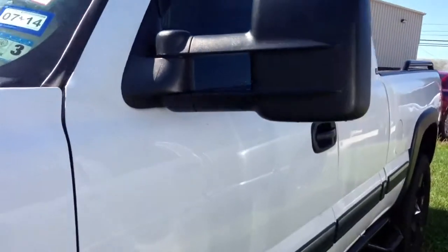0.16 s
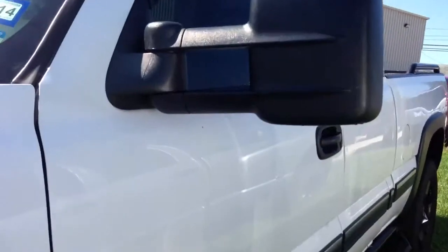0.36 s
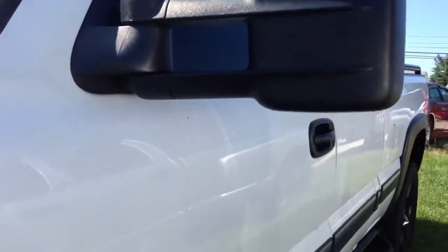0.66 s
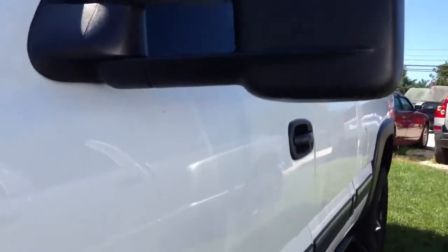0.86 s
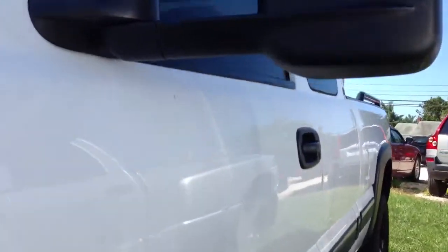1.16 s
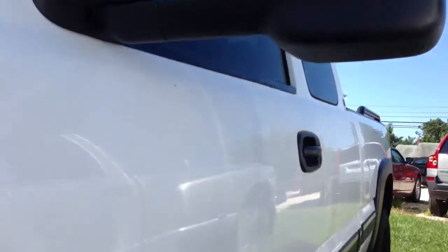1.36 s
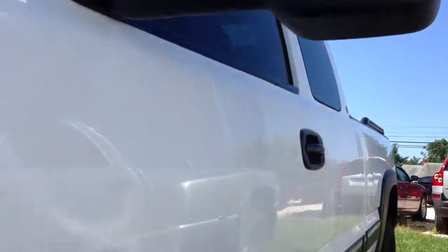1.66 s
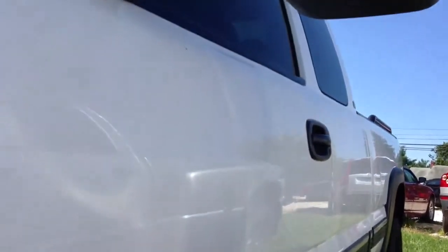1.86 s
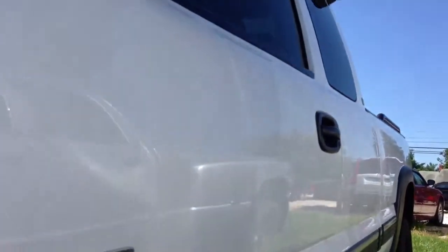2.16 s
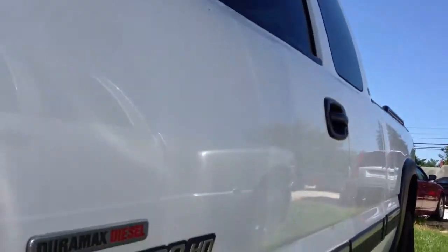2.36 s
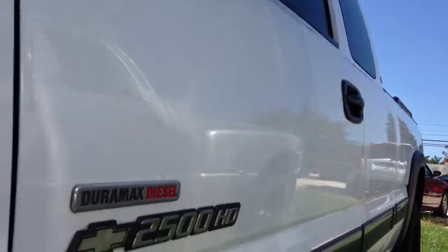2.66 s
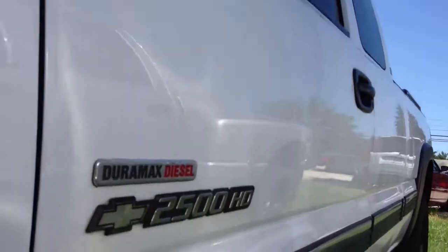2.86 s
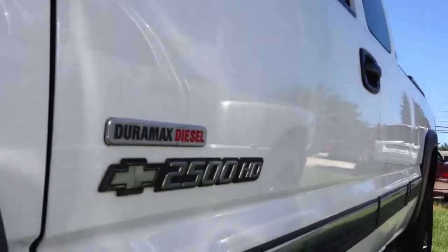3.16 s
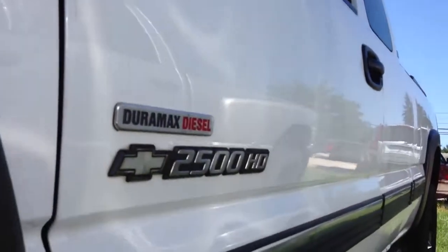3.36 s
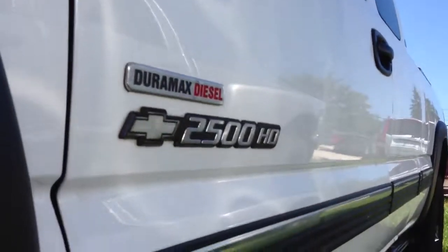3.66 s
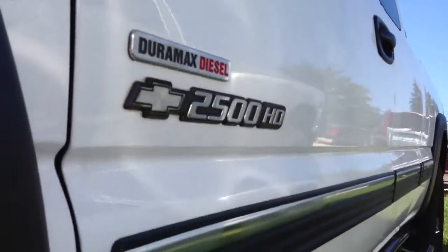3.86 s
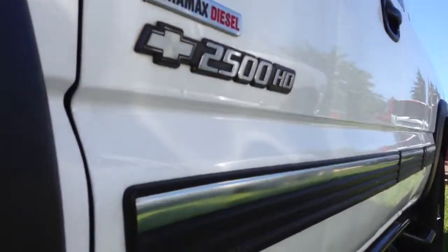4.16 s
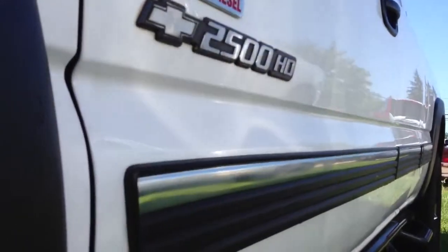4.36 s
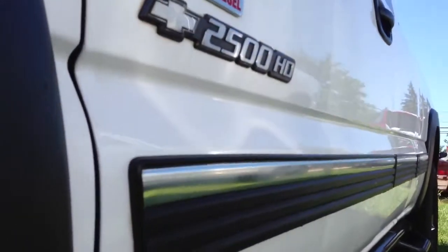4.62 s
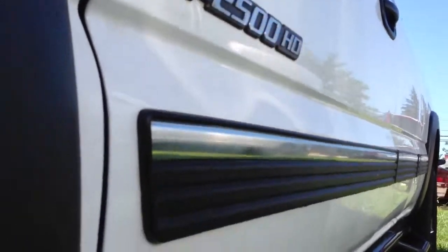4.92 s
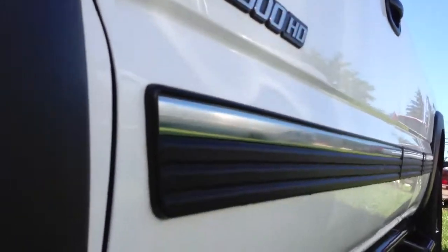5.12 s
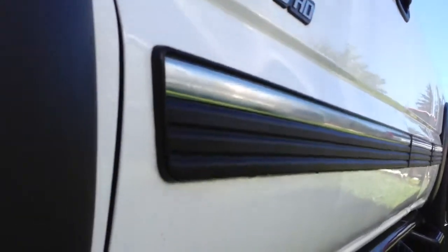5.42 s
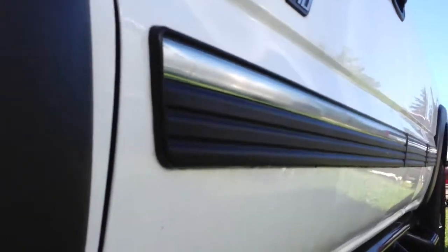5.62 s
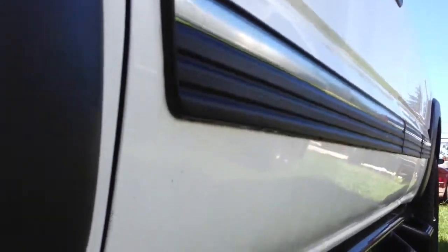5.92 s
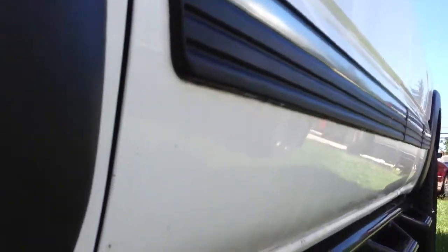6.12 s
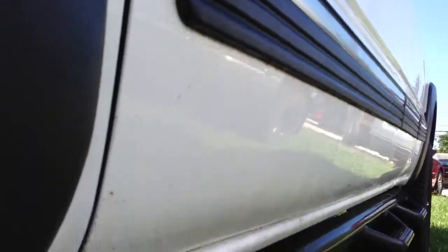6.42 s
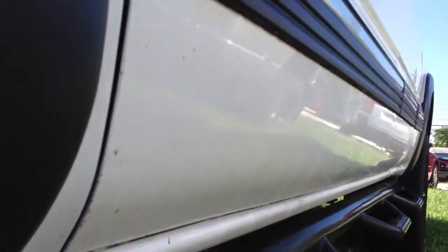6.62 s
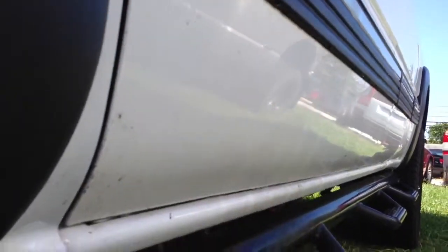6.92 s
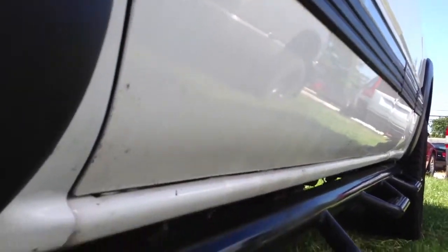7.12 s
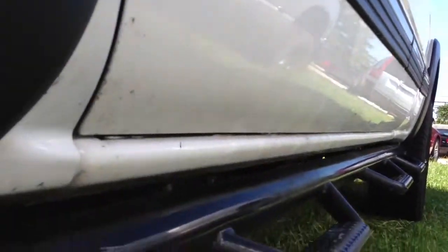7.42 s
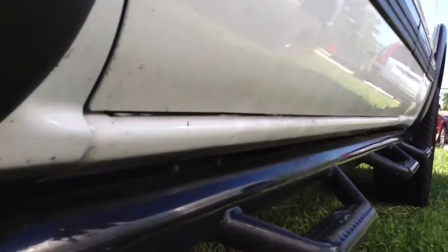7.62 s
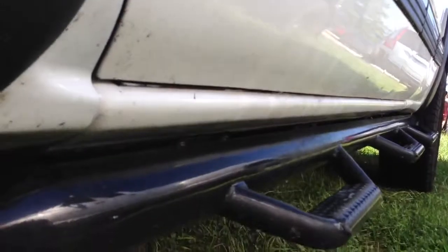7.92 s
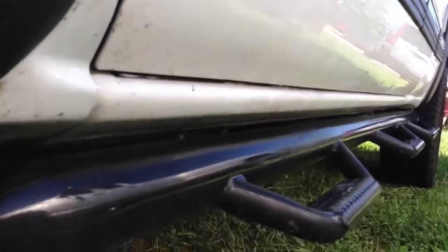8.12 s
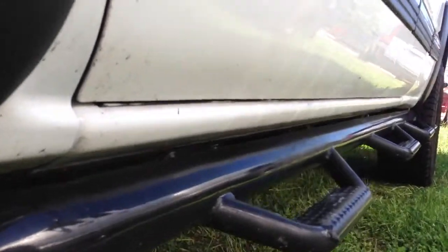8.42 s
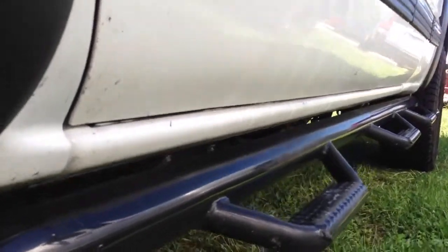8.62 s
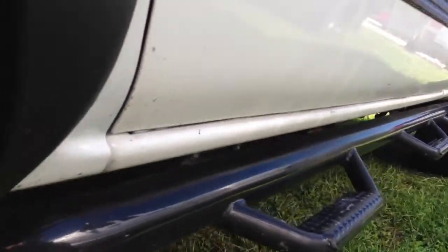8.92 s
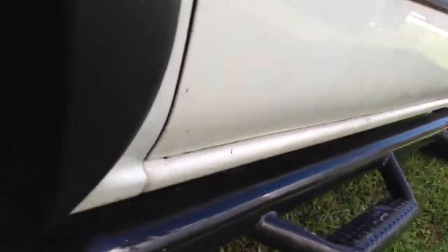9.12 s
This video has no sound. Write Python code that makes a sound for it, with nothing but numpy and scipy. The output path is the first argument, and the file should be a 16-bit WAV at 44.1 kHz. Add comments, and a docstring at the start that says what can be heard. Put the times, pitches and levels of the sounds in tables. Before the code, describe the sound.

A diesel engine idles as a low throbbing hum outdoors, with soft wind thumps, thin high insect trilling and a few late handling ticks.

```python
"""Diesel engine idling outdoors

A diesel engine idles with a drifting speed: many multiples of its crank speed, shaped by the exhaust, hum
near 200 Hz. Wind at a small hand-held microphone is lumpy low noise with short thumps. Far traffic, a low
drone, rustling grass and hiss are shaped noise; a cricket sings in paired tones and katydids in runs of
short rings. The camera body adds ticks (filtered clicks) and the scrape of a sliding hand (noise).
"""
import sys
import numpy as np
from scipy import signal
from scipy.fft import rfft, irfft
from scipy.io import wavfile
from scipy.ndimage import uniform_filter1d

SR = 44100
rng = np.random.default_rng(int(sys.argv[2]) if len(sys.argv) > 2 else 0)


def natural_amplitude(level_db):
    """Convert a level in decibels to a linear amplitude factor, elementwise."""
    exponent = np.asarray(level_db, float) / 20
    return 10 ** exponent


def pcm_store(signal):
    """Save signal as 16-bit PCM."""
    levels = np.round(np.clip(np.atleast_2d(signal), -1, 1) * 32767)
    wavfile.write(sys.argv[1], SR, levels.astype(np.int16).T)


N = 409248  # length of the scene in samples

# Colours are noise spectra of which only the shape counts: (frequency [Hz], level per hertz [dB])
# the microphone's own noise
HISS_COLOUR = [(100, -2), (400, 2), (3000, -1.5), (7000, -3.5), (11000, -5.5), (16000, -7)]
# far traffic
TRAFFIC_COLOUR = [(150, -27), (250, 3), (398, -2), (511, -14), (782, -9), (909, -9.5), (1230, -9),
                  (3220, -23.5), (5000, -28.5), (6500, -33.5), (11000, -120)]
# far low drone
DRONE_COLOUR = [(20, -15), (60, -12.5), (100, -2.5), (140, 3.5), (300, -48), (1200, -90)]
# stirring grass
RUSTLE_COLOUR = [(880, -37), (1600, -0.5), (2330, -2.5), (4100, -11), (6000, -12.5), (7750, -17.5),
                 (15500, -37)]
# a hand sliding on the camera body
SCRAPE_COLOUR = [(800, -40), (1500, 2), (2000, -4), (2700, -10), (3900, -6.5), (5000, -13), (6500, -21)]
# wind at the microphone
RUMBLE_COLOUR = [(15, -61), (76, -24), (134, 6.5), (189, 13.5), (279, -14), (340, -11), (405, -8),
                 (450, -17), (525, -18), (719, -20), (810, -15), (900, -25), (1170, -24), (1980, -120)]

# loudness of the far traffic: (time [s], level [dB])
TRAFFIC_LEVEL = [(0, -50.5), (1.5, -50.5), (2.5, -60), (4, -56.5), (6.1, -60), (6.7, -64.5), (8.1, -59.5),
                 (8.7, -62), (9.28, -56)]
# the grass stirs: (peak time [s], peak level [dB], half length [s])
STIRS = [(0, -59.5, 0.22), (.7, -56.5, 0.36), (1.9, -63.5, 0.48), (3.8, -67.5, 1)]
# brief airy puffs: (peak time [s], peak level [dB], half length [s])
PUFFS = [(.85, -63, .03), (.96, -62.5, 0.054)]
# slides of the hand: (peak time [s], peak level [dB], half length [s])
SLIDES = [(8.95, -69, .1), (9.2, -62, 0.24)]
# runs of rasps of two near katydids, a higher and a lower one; the level is 7 dB above the usual peak of
# one stroke: (start time [s], rasps [count], gap between rasp starts [s], level [dB], pitch [Hz])
KATYDIDS = [(.39, 12, .169, -65, 9400), (2.465, 2, .17, -62, 9350), (3.035, 6, .166, -64, 9400),
            (4.99, 7, .155, -66, 9400), (.095, 3, .19, -64, 9000), (2.78, 18, .1965, -64.5, 8980),
            (6.114, 9, .1553, -61.5, 9330), (7.271, 7, .1572, -61.5, 9450), (8.39, 6, .169, -61.5, 9530)]
# the cricket's usual levels: (time [s], peak of the note [dB], tick against the note [dB])
CRICKET_LEVELS = [(0, -70, -3), (1.05, -68, -6), (1.8, -66.5, -8), (2.15, -75, 3), (2.5, -67, -8),
                  (3.35, -64.5, -8), (3.7, -76, -5), (4.3, -62, -3), (5, -71, -3), (5.55, -59, -19),
                  (6.2, -67, -18), (7.6, -66, 1), (9.28, -68, 10)]
# the cricket's beat wanders: (time [s], lateness [chirps])
CRICKET_LATENESS = [(0, .4), (.75, .67), (2.1, .69), (2.6, .56), (4.5, .48), (6.5, .63), (7.25, .65),
                    (9.28, .47)]
# ticks of the camera body: (time [s], peak level [dB], centre [Hz], time for its puff to fall 60 dB [s])
TICKS = [(.8, -47, 5000, .015), (7.125, -46.5, 1800, 0.03), (7.125, -50, 4400, .01),
         (8.447, -47, 1110, 0.024), (9.021, -42.5, 4100, .02), (9.057, -46, 2400, .03),
         (9.069, -51, 4800, .02), (9.08, -45, 4600, .025), (9.159, -36, 705, 0.03),
         (9.163, -44, 2390, 0.025)]
# swells of wind at the microphone: (peak time [s], peak level [dB], half length [s])
WIND_SWELLS = [(.27, -37, 0.061), (.76, -45, 0.72), (1.32, -41, 0.037), (1.72, -44.5, 0.16),
               (2.05, -47.5, 0.17), (2.55, -42.5, 0.1), (3.1, -43.5, 0.39), (3.44, -41.5, 0.088)]
# bumps of wind at the microphone; close ones make up one gust:
# (peak time [s], peak level of the swing [dB], centre [Hz], half length of the turbulence around it [s])
WIND_BUMPS = [(.232, -24.5, 196, 0.017), (0.25, -29.5, 300, 0.013), (0.339, -27, 220, 0.005),
              (0.371, -28, 192, .01), (1.012, -32, 370, 0.016), (1.025, -28, 353, 0.006),
              (1.566, -19, 400, 0.018), (1.574, -28.5, 272, 0.0054), (1.585, -24.5, 340, 0.0094),
              (1.7, -32, 193, 0.013), (2.57, -26.5, 217, 0.0046), (2.582, -27, 418, 0.0055),
              (2.705, -41, 261, 0.0059), (2.732, -29.5, 293, 0.0098), (2.753, -27.5, 203, 0.0047),
              (3.268, -28.5, 266, 0.0082), (3.432, -32, 273, 0.015), (3.503, -32.5, 220, 0.0081),
              (4.029, -31, 224, 0.0041), (4.061, -34, 330, 0.0079), (4.915, -27, 235, 0.035),
              (8.45, -36.5, 515, 0.014)]
# engine speed, a sag, steady, a climb, steady again, a small sag: (time [s], crank speed [turns per s])
CRANK_SPEED = [(0, 12.1), (.65, 11.85), (1.1, 11), (3.9, 10.75), (4.3, 11.05), (4.75, 11.3), (5.05, 12),
               (5.4, 12.26), (5.8, 12.4), (7.75, 12.32), (8.05, 11.9), (8.3, 11.78), (9.28, 11.88)]
# loudness of an odd multiple of the crank speed at the exhaust's resonance: (time [s], level [dB])
ENGINE_LEVEL = [(0, -35.5), (0.5, -43.5), (1.6, -53.5), (2.05, -42), (2.6, -55.5), (3.9, -48), (4.5, -43.5),
                (5.1, -39.5), (5.8, -42), (6.4, -46), (7.1, -46), (8.4, -51.5), (9.28, -49)]
# how exhaust and body pass each frequency: (frequency [Hz], gain [dB])
EXHAUST = [(100, -26), (140, -15.5), (162, -11.5), (172, 0), (185, .5), (210, 0.5), (232, -18.5),
           (330, -30.5), (410, -25), (600, -34.5), (2000, -101)]


def evened(x):
    """Scales a sound to an rms of 1."""
    return x / np.sqrt(np.mean(x ** 2) + 1e-20)


def read(points, hz):
    """Reads a spectrum at the given frequencies, along a logarithmic scale."""
    f, value = np.transpose(points)
    return np.interp(np.log(hz + 1), np.log(f + 1), value)


def curves(rows):
    """Draws each column of a table as a curve over time, one value per sample."""
    s, *columns = np.transpose(rows)
    return [np.interp(np.arange(N) / SR, s, column) for column in columns]


def add(mix, s, sound):
    """Mixes a sound in, starting at second s."""
    part = mix[round(s * SR):][:len(sound)]
    part += sound[:len(part)]


def wander(hz):
    """A random curve of rms near 1: hz random points a second, joined by straight lines."""
    steps = int(N / SR * hz) + 2
    curve = np.interp(np.arange(N) / SR * hz, np.arange(steps), rng.standard_normal(steps))
    return curve * np.sqrt(1.5)  # makes up for what the straight lines smooth away


def band(x, hz, spread):
    """Keeps a band from hz / spread to hz * spread, its top held to a third of the sample rate."""
    edges = [hz / spread, min(hz * spread, SR / 3)]
    return signal.sosfilt(signal.butter(2, edges, "band", fs=SR, output="sos"), x)


def swells(rows):
    """Gain of bell-shaped swells whose powers add; at its half length a swell's power is down to 1/e."""
    t = np.arange(N) / SR
    # each power is the square of the gain times the bell
    return np.sqrt(sum(natural_amplitude(db) ** 2 * np.exp(-((t - s) / half) ** 2) for s, db, half in rows))


def coloured(colour):
    """Steady noise of a given colour, at rms 1."""
    white = rfft(rng.standard_normal(N))
    return evened(irfft(white * natural_amplitude(read(colour, np.fft.rfftfreq(N, 1 / SR))), N))


def noise(colour, patchy_db, streaky_db=0, streak_frames=40):
    """Noise of rms 1 from random short-time spectra with drifting patches and narrow streaks."""
    real, imaginary, patches, streaks = rng.standard_normal((N // 256 + 5, 513, 4)).T
    # smooth over frequency bins, then over frames 256 samples apart
    patches = evened(uniform_filter1d(uniform_filter1d(patches, size=10, axis=0), size=16, axis=1))
    streaks = uniform_filter1d(uniform_filter1d(streaks, size=2, axis=0), size=streak_frames, axis=1)
    shape_db = read(colour, np.fft.rfftfreq(1024, 1 / SR))[:, None]
    shape_db = shape_db + patchy_db * patches + streaky_db * evened(streaks)
    spectra = (real + 1j * imaginary) * natural_amplitude(shape_db)
    return evened(signal.istft(spectra, nperseg=1024, noverlap=768)[1][:N])


def microphone_hiss(level_db=-65.5):
    """The microphone's own faint noise, a little patchy."""
    return natural_amplitude(level_db) * noise(HISS_COLOUR, patchy_db=0.8)


def far_traffic():
    """Far traffic blurs into a streaky hiss that slowly swells and fades."""
    return natural_amplitude(curves(TRAFFIC_LEVEL)[0]) * noise(TRAFFIC_COLOUR, patchy_db=1.1, streaky_db=2.5)


def far_drone(level_db=-60.5, follow=0.09, waver_db=0.65):
    """Low noise that wavers quickly and follows the traffic's level by a small share."""
    traffic_db = curves(TRAFFIC_LEVEL)[0]
    drone_db = level_db + follow * (traffic_db - traffic_db.mean()) + waver_db * wander(18)
    return natural_amplitude(drone_db) * coloured(DRONE_COLOUR)


def grass_rustle(snaps_per_s=60, snap_height=0.1995):
    """Stirring grass is noise with squeaky streaks, its gain raised by many tiny snaps."""
    snaps = (rng.random(N) < snaps_per_s / SR) * rng.exponential(snap_height, N)
    crackle = 1 + signal.lfilter([1], [1, -.994], snaps)  # each snap dies in a few ms
    grass = noise(RUSTLE_COLOUR, patchy_db=2.2, streaky_db=5, streak_frames=7)
    return swells(STIRS) * crackle * grass


def airy_puffs():
    """Brief swells of noise with the microphone hiss's wide spectrum."""
    return swells(PUFFS) * coloured(HISS_COLOUR)


def hand_scrape():
    """A hand sliding on the camera body makes swells of patchy, streaky noise."""
    return swells(SLIDES) * noise(SCRAPE_COLOUR, patchy_db=3, streaky_db=2.5)


def katydids(far_hz=9070, strokes_per_s=128, ring_s=0.0024, far_db=-74, far_gap_s=0.1):
    """A rasp is six quick wing strokes, each a short ring; fainter, loosely timed far rasps fill in."""
    out, t = np.zeros(N), np.arange(300) / SR
    rasps = [(s + k * gap, db, hz) for s, count, gap, db, hz in KATYDIDS for k in range(count)]
    for k, (delay, louder) in enumerate(rng.random((70, 2))):
        rasps.append((far_gap_s * (k + .6 * delay), far_db + 4 * louder, far_hz))
    envelope = (t / ring_s) * np.exp(1 - t / ring_s)  # peaks at 1
    for (s, db, hz), luck in zip(rasps, rng.standard_normal((len(rasps), 6, 3))):
        # the first row of luck also serves the whole rasp
        late, rasp_pitch, rasp_db = luck[0]
        for k, (stroke_pitch, jitter, stroke_db) in enumerate(luck):
            pitch = hz * (1 + .004 * rasp_pitch + .012 * stroke_pitch)
            ring = envelope * np.sin(2 * np.pi * pitch * t)
            start = s + .004 * abs(late) + k / strokes_per_s + 0.00027 * jitter
            add(out, start, natural_amplitude(db - 7 + stroke_db + rasp_db) * ring)
    return out


def cricket(chirps_per_s=17.06, note_hz=8030, note_s=.008, tick_hz=7750, tick_s=.003, after_s=.01, fall=.03):
    """On each beat a steady note, then a shorter and lower tick whose pitch falls slightly."""
    t = np.arange(N) / SR
    beat = chirps_per_s * t - curves(CRICKET_LATENESS)[0]
    since = (beat - np.round(beat)) / chirps_per_s  # seconds from the nearest beat
    number = np.round(beat).astype(int) + 1
    level_db, tick_db = curves(CRICKET_LEVELS)
    # each chirp has its own luck
    note_luck, tick_luck, pitch_luck, phase = rng.standard_normal((number.max() + 1, 4))[number].T
    note = np.sin(2 * np.pi * (note_hz * (1 + 0.0028 * pitch_luck) * t + phase))
    note *= np.exp(-(since / note_s) ** 2)
    u = (since - after_s) / tick_s
    tick = np.exp(-u ** 2) * np.sin(2 * np.pi * tick_hz * tick_s * (u - fall * u ** 2 / 2))
    return natural_amplitude(level_db + 1.7 * note_luck) * note + natural_amplitude(level_db + tick_db + 2.2 * tick_luck) * tick


def camera_ticks(spread=1.45):
    """A dry tick (a bright one may sound with a dull one): a click and a short puff through a wide band."""
    out, t = np.zeros(N), np.arange(3000) / SR
    for (s, db, hz, t60), puff in zip(TICKS, rng.standard_normal((len(TICKS), 3000))):
        source = (t == 0) + 0.08 * puff * natural_amplitude(-60 * t / t60)
        tick = band(band(source, hz, spread), hz, spread)
        add(out, s, natural_amplitude(db) * tick / abs(tick).max())
    return out


def wind_rumble(breeze_db=-50.5, calm_s=4.6, lumps_db=2.5, lumps_hz=25):
    """Lumpy low wind noise: a breeze with swells; the breeze dies down near the middle."""
    breeze = natural_amplitude(breeze_db - 90 * np.maximum(np.arange(N) / SR - calm_s, 0))  # falls 90 dB per s
    strength = np.hypot(breeze, swells(WIND_SWELLS))  # powers add
    return coloured(RUMBLE_COLOUR) * strength * natural_amplitude(lumps_db * wander(lumps_hz))


def wind_bumps(tremble=0.25, cycles=0.95, skirt_gain=0.199, skirt_spread=1.45, body_hz=190):
    """Each bump swings the pressure for a few uneven cycles inside a longer, softer burst of turbulence."""
    out, t = np.zeros(N), np.arange(-3000, 3000) / SR
    for (s, db, hz, half), air in zip(WIND_BUMPS, rng.standard_normal((len(WIND_BUMPS), len(t)))):
        uneven = tremble * evened(band(band(air, hz, 1.6), hz, 1.6))
        swing = np.sin(2 * np.pi * hz * t + air[0]) + uneven
        swing *= np.exp(-(t * hz / cycles) ** 2)
        # low body of the thump
        swing += np.sin(2 * np.pi * body_hz * t + air[1]) * np.exp(-(t * body_hz) ** 2) / 3
        turbulence = evened(band(band(air[::-1], hz, skirt_spread), hz, skirt_spread))
        skirt = turbulence * np.exp(-(t / half) ** 2)
        add(out, s + t[0], natural_amplitude(db) * (swing / abs(swing).max() + skirt_gain * skirt))
    return out


def engine(odd_db=7, waver_db=1.5, waver_hz=5, slip=.35, breath_db=-9):
    """Tones at multiples of the crank speed; uneven cylinders favour odd ones, and each wavers alone."""
    speed, level_db = curves(CRANK_SPEED)[0], curves(ENGINE_LEVEL)[0]
    turns, tones = np.cumsum(speed) / SR, np.zeros(N)
    for k in range(8, 54):
        db = read(EXHAUST, k * speed) - odd_db * (1 - k % 2)  # even multiples are weaker
        phase = 2 * np.pi * (k * turns + rng.random())
        phase += slip * (k / 17) ** 4 * wander(waver_hz)  # high multiples blur most
        tones += natural_amplitude(db + waver_db * wander(waver_hz)) * np.sin(phase)
    breath = natural_amplitude(breath_db) * coloured(EXHAUST)  # turbulent gas in the same pipe
    return natural_amplitude(level_db) * (tones + breath)


def scene():
    """Adds up all sources, in mono."""
    background = microphone_hiss() + far_traffic() + far_drone() + grass_rustle() + airy_puffs()
    details = hand_scrape() + katydids() + cricket() + camera_ticks()
    return (background + details + wind_rumble() + wind_bumps() + engine())[None]


def band_limit(x):
    """A steep low-pass at the top of the band."""
    return signal.sosfilt(signal.butter(12, 16140, fs=SR, output="sos"), x)


def record(dry):
    """The microphone's bass cut near 45 Hz and a sharp limit at 15350 Hz."""
    hz = np.fft.rfftfreq(N, 1 / SR)
    response = (hz < 15350) / np.sqrt(1 + (45 / (hz + 1)) ** 4)
    mix = irfft(rfft(dry) * response, N)
    return band_limit(mix)


dry = scene()
out = record(dry)
pcm_store(out)
```